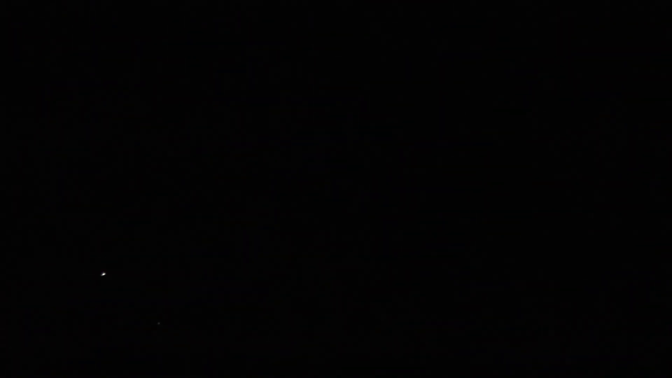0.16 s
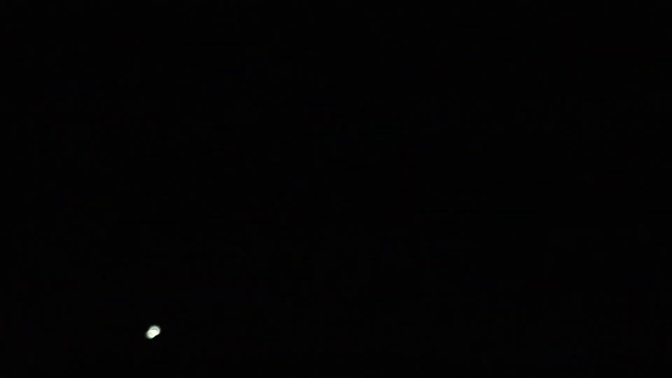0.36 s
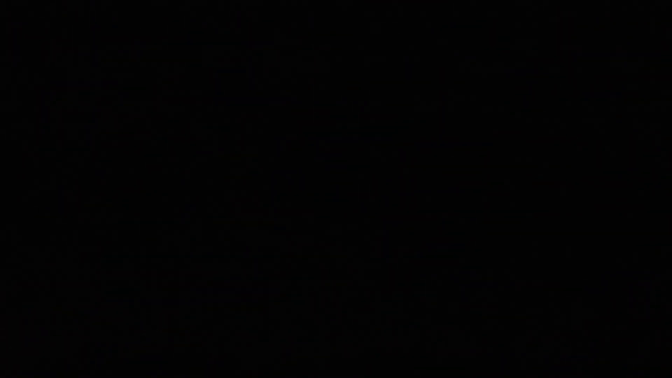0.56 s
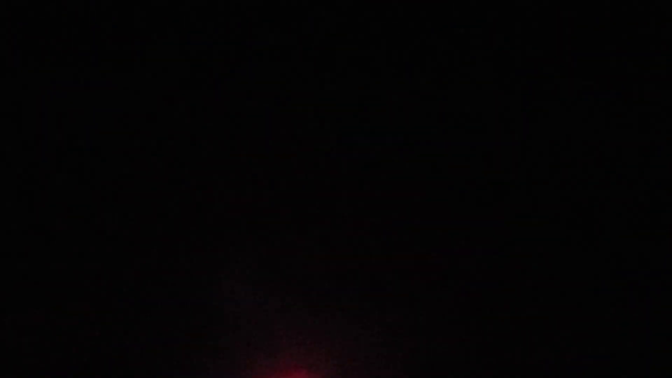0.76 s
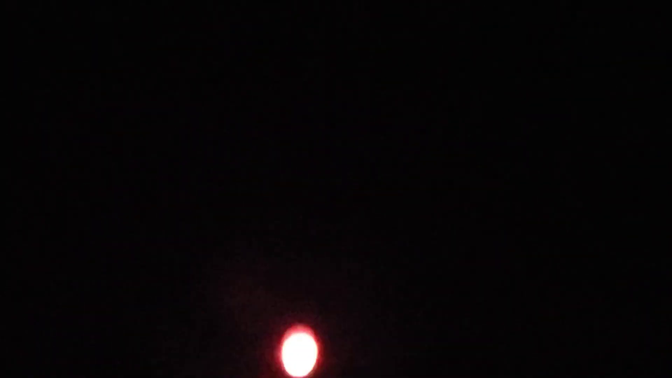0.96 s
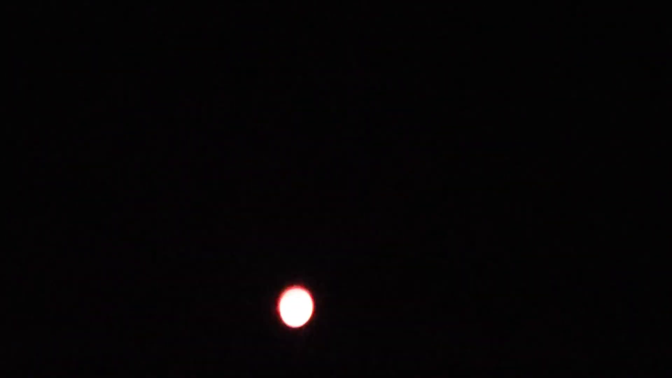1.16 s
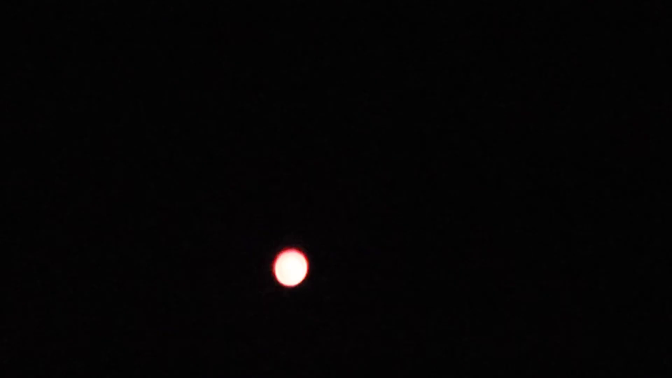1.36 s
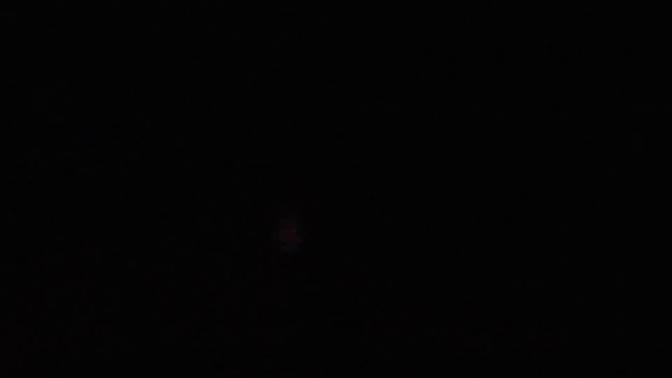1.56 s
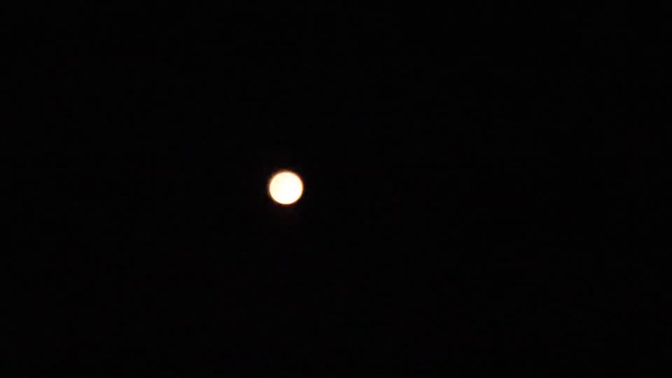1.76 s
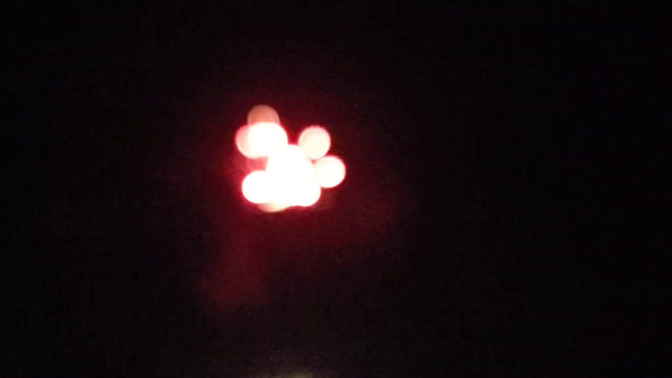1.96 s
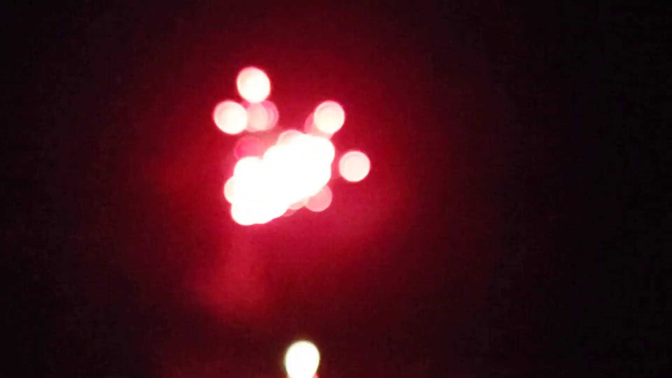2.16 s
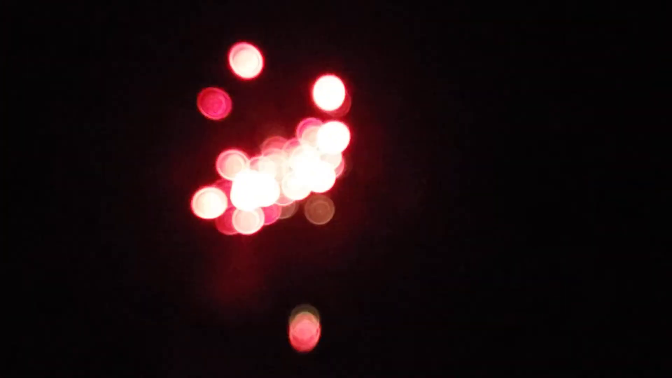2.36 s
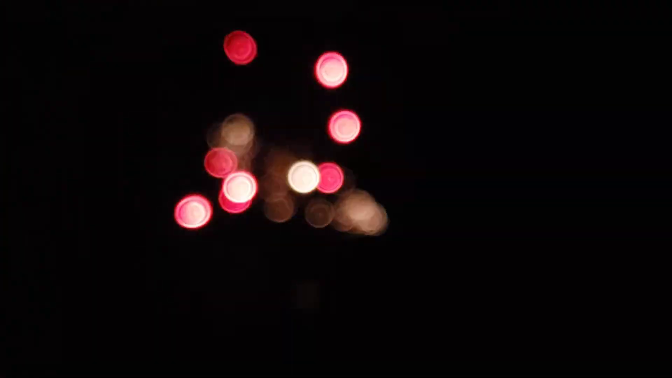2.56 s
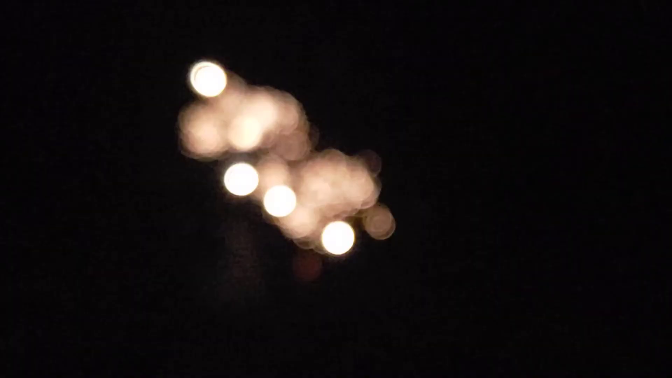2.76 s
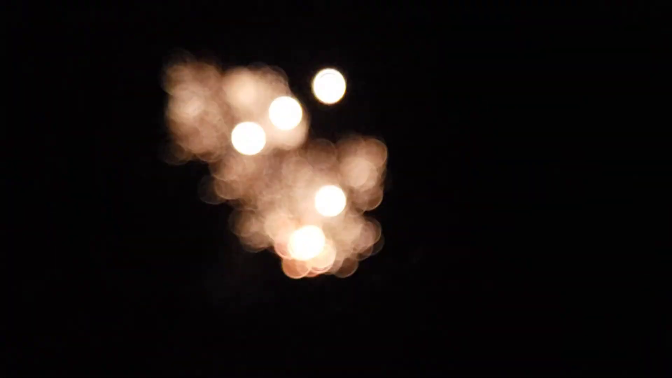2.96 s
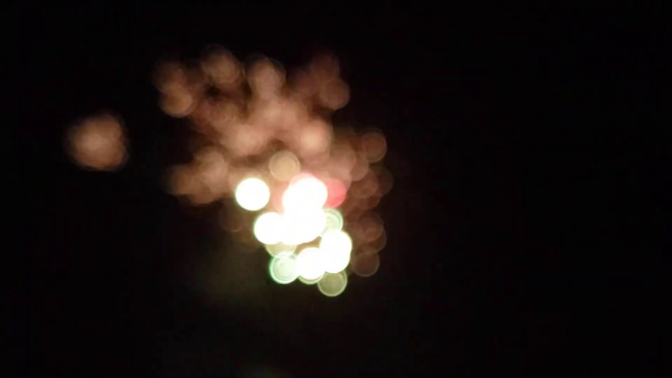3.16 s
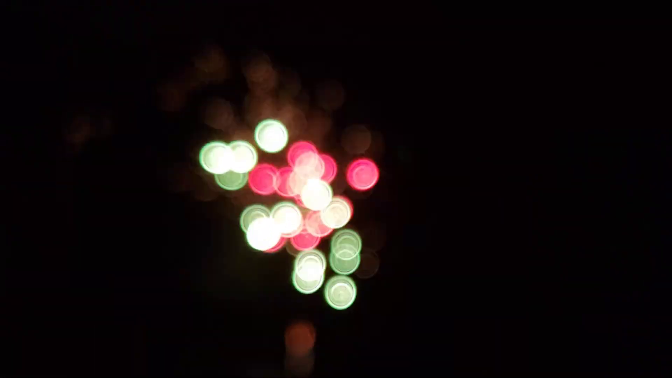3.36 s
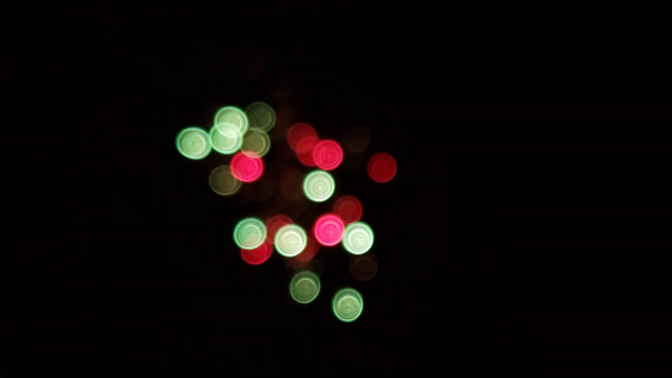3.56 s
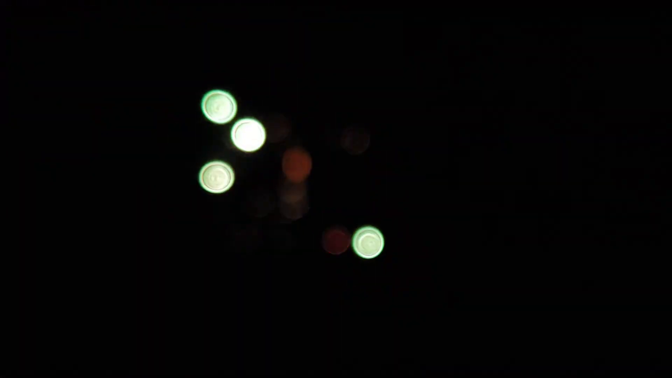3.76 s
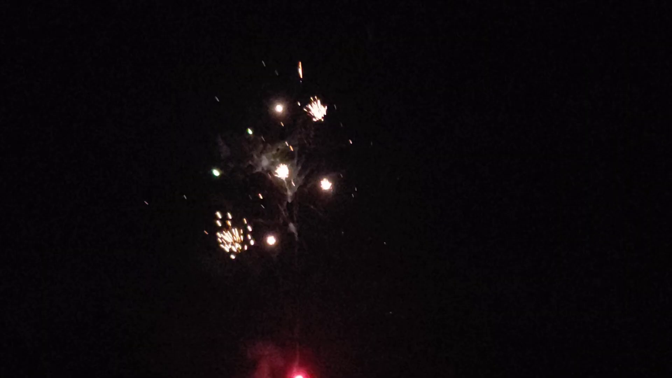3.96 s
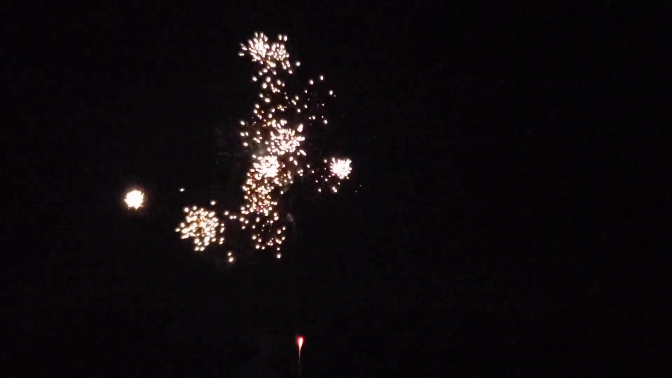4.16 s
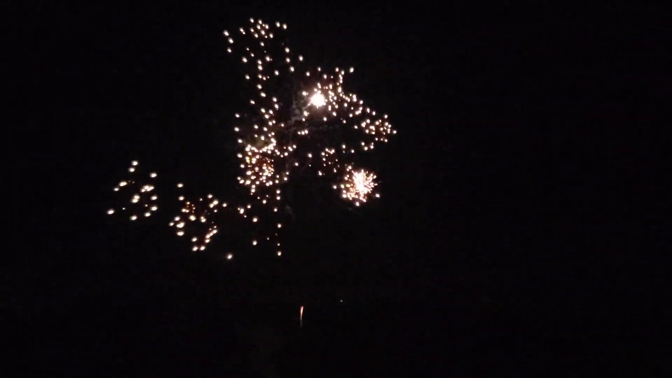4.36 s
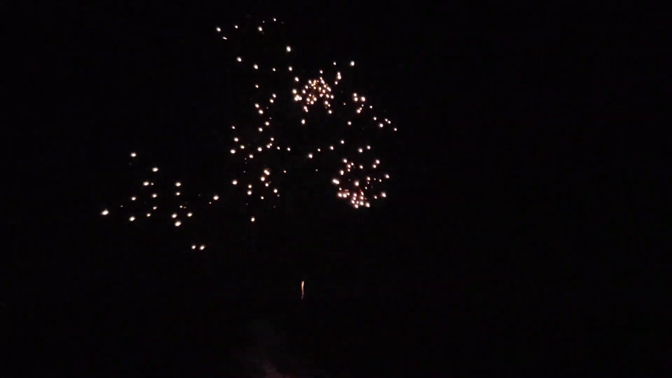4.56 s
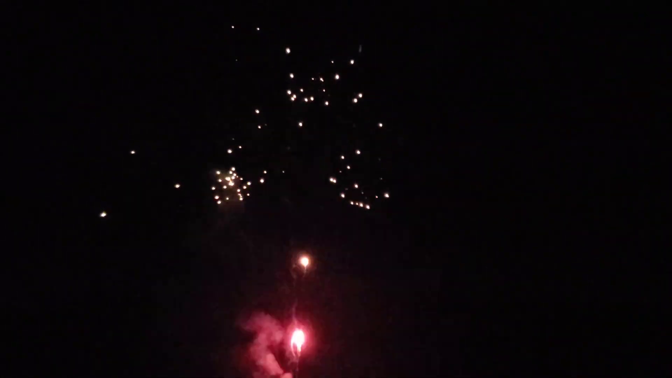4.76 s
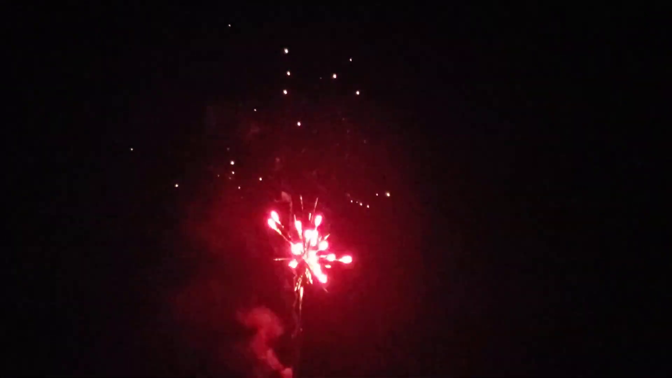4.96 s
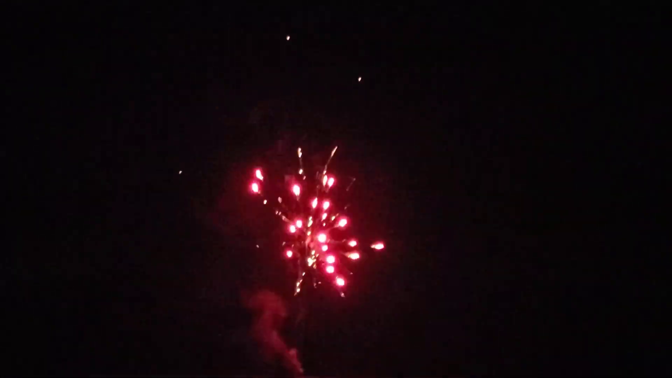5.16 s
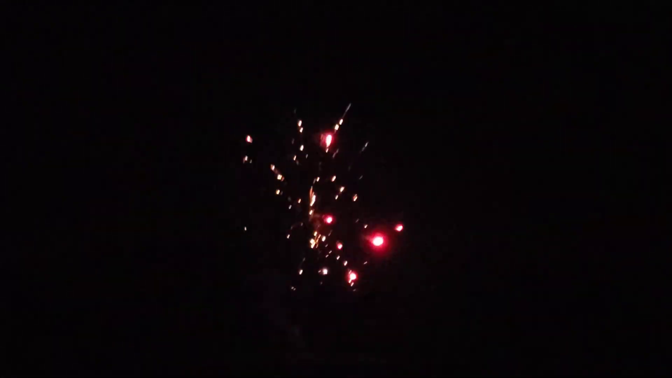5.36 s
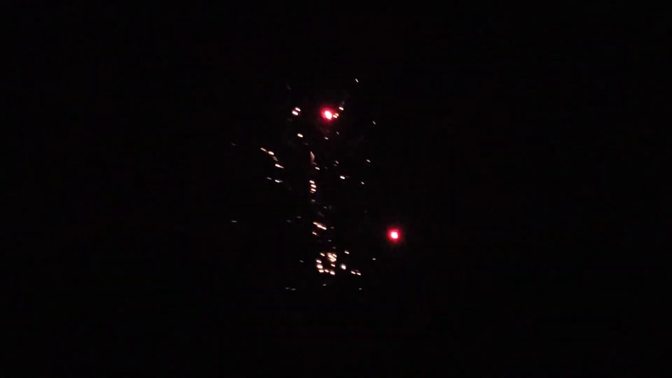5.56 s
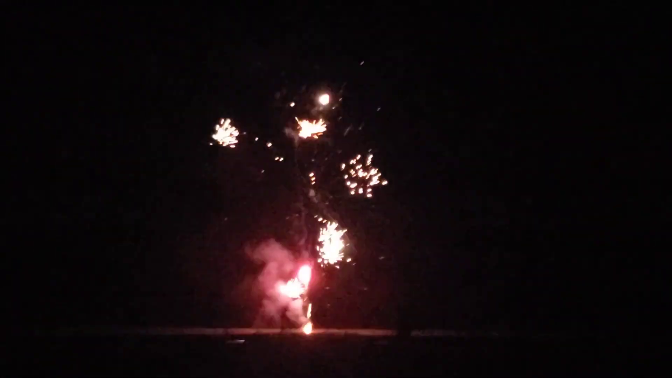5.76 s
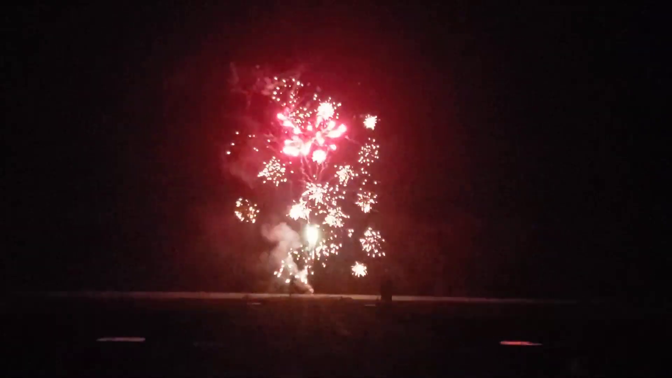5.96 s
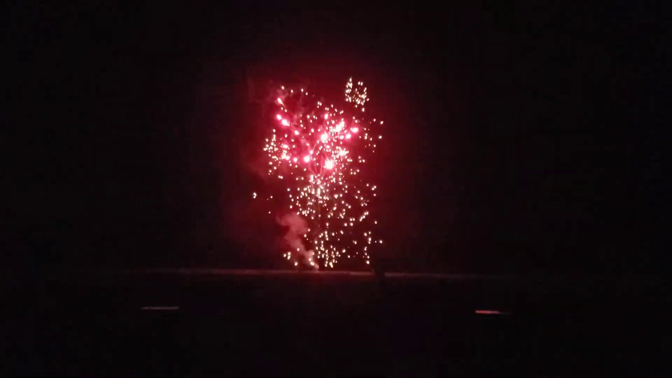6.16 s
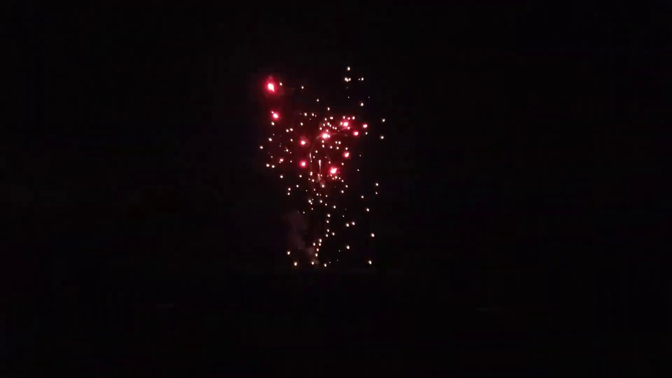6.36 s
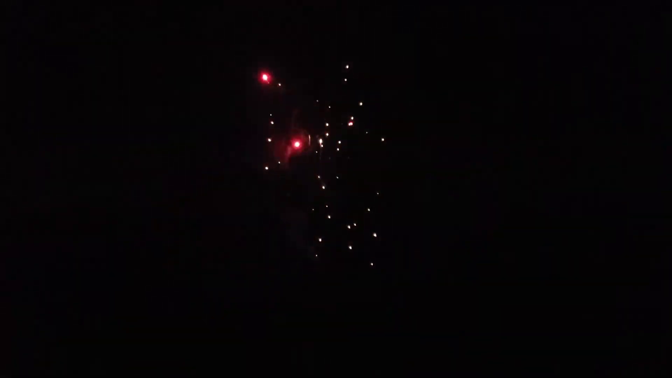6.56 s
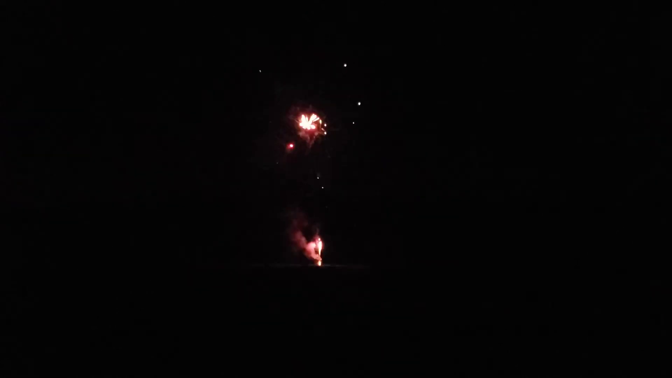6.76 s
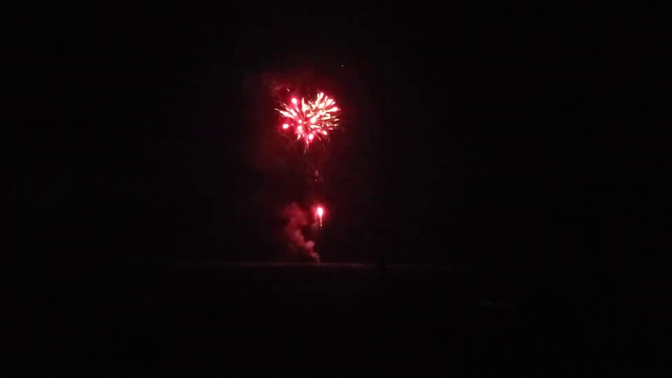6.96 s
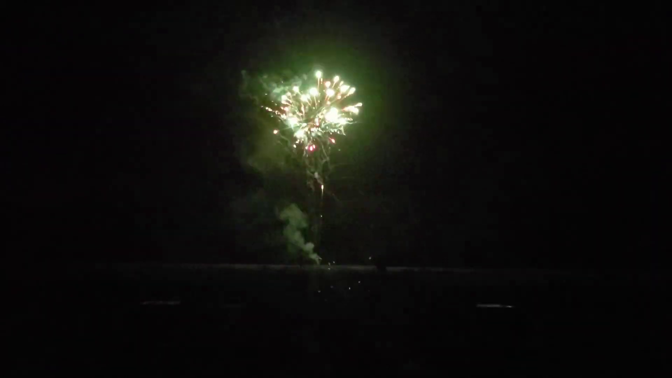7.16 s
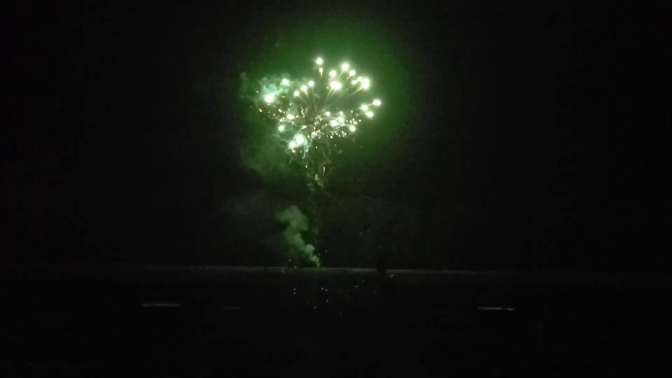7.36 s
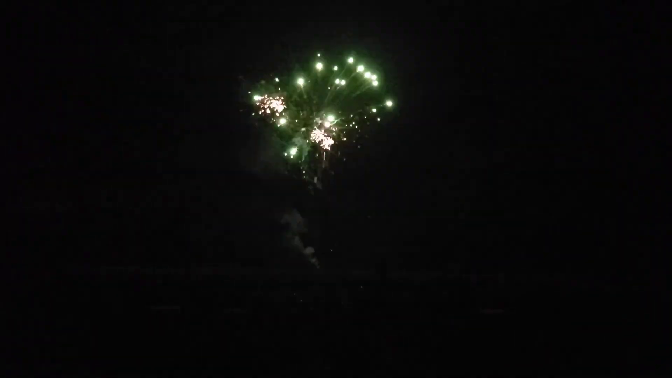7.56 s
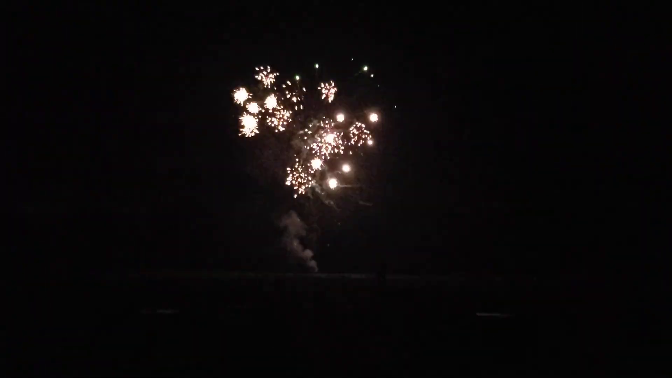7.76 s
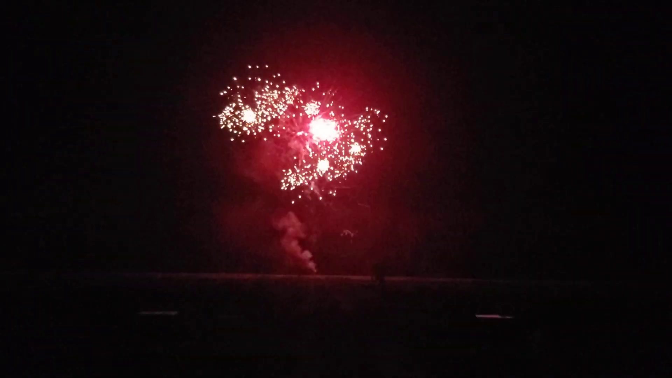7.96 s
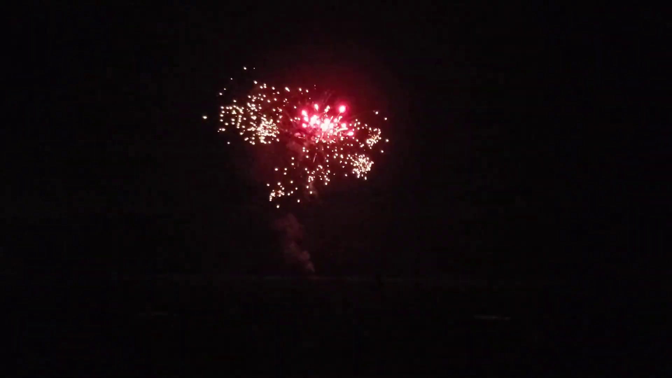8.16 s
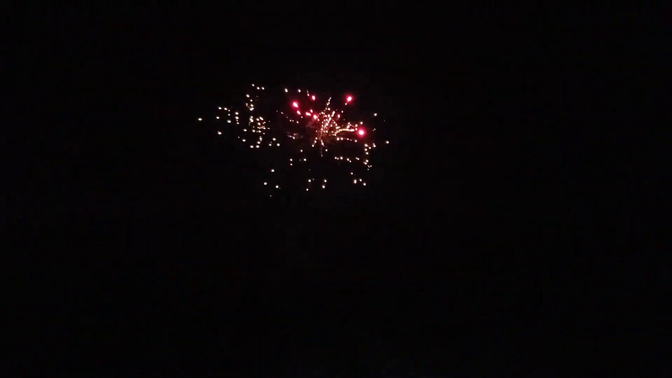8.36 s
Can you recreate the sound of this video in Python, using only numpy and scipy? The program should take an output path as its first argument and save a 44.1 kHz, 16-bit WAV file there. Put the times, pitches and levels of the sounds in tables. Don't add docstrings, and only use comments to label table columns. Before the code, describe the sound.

Small consumer fireworks go up one after another over open ground. Short tube thumps precede dry, hard bangs; dense snapping crackle comes in three main volleys, with a single piercing, descending whistle in the middle. Echoes slap back quickly, then swell from far trees and linger. A fast raspy cricket buzz and faint insect haze fill the gaps. The camera is some way off, its sound brighter on the right and squashed by the loudest blasts.

```python
import sys
import numpy as np
from scipy import signal
from scipy.fft import rfft, irfft, next_fast_len
from scipy.io import wavfile
from scipy.ndimage import map_coordinates

SR = 44100
rng = np.random.default_rng(int(sys.argv[2]) if len(sys.argv) > 2 else 0)


def file_out(sig):
    cols = np.atleast_2d(sig).T
    lim = np.clip(cols, -1, 1)
    pcm = np.round(lim * 32767).astype(np.int16)
    wavfile.write(sys.argv[1], SR, pcm)


def gain_from_decibels(decibels):
    exponent = np.asarray(decibels, float) / 20
    return 10 ** exponent


N = 370440


def unit(x):
    return x / np.sqrt(np.mean(x ** 2) + 1e-20)


def along(points, hz):
    f, v = np.transpose(points)
    return np.interp(np.log(hz + 1), np.log(f + 1), v)


def curves(rows):
    s, *cols = np.transpose(rows)
    return [np.interp(np.arange(N) / SR, s, c) for c in cols]


def wobble(rate):
    return map_coordinates(rng.standard_normal(int(N * rate / SR) + 4), [np.arange(N) * rate / SR])


def filtered(x, response):
    m = 2 * next_fast_len(x.shape[-1] // 2 + 4096)
    return irfft(rfft(x, m) * response(np.fft.rfftfreq(m, 1 / SR)), m)[..., :x.shape[-1]]


def coloured(x, colour):
    return filtered(x, lambda hz: gain_from_decibels(along(colour, hz)))


def causal(db):
    c = irfft(np.log(gain_from_decibels(db)))
    c[1:len(c) // 2] *= 2
    c[len(c) // 2 + 1:] = 0
    return np.exp(rfft(c))


def add(track, s, x):
    room = track[..., round(s * SR):][..., :x.shape[-1]]
    room += x[..., :room.shape[-1]]


def blast(ms, bounce_ms, bounce_db):
    u = (np.arange(600) / SR * 1000 - np.array([[0], [bounce_ms]])) / ms
    pulses = (u >= 0) * (1 - u) * np.exp(-np.abs(u))
    return gain_from_decibels([0, bounce_db]) @ pulses


# (time [s], ground bounce delay [ms], bounce level [dB], overload swing [dB], far roll [dB])
SHELLS = [
    (2.1925, 2.216, -4, -13, -3),
    (2.326, 2.276, -3.5, -19, -0.5),
    (3.2489, 1.7, -15, -10, -1.5),
    (3.4844, 2, -2.5, -29.5, -1),
    (5.2314, 1.15, -3, -12.5, 2.5),
    (6.1565, 1.73, -6, -17.5, 0),
    (7.1589, 5.1, -14, -10, -1),
    (7.3203, 1.14, -5.5, -11, -1.5),
    (8.2982, 1.36, -5.5, -24, 4),
]


def shells():
    near, far, swing, t = np.zeros(N), np.zeros(N), np.zeros(N), np.arange(SR // 5) / SR
    db = 1.48
    for s, bounce_ms, bounce_db, swing_db, roll_db in SHELLS:
        ms = 0.3 * gain_from_decibels(0.11 * (swing_db + 10.0))
        add(near, s, gain_from_decibels(db + 2) * blast(ms, bounce_ms, bounce_db))
        add(near, s, gain_from_decibels(db - 5.5) * blast(1.62 * ms, 2.45, -3))
        add(far, s, gain_from_decibels(db + 5 + roll_db) * blast(ms, 0, -60))
        debris = np.diff(rng.standard_normal(len(t) + 1))
        add(near, s, gain_from_decibels(db - 15.5 - 60 * t / 0.022) * debris)
        turns = 62 * t - 170 * t ** 2
        swing_level = gain_from_decibels(swing_db + 11.0 - 60 * t / 0.072) * (t < .15)
        add(swing, s + 0.0025, swing_level * np.sin(2 * np.pi * turns))
    return near, far, swing


# (time [s], peak level [dB])
STARS = [(2.8328, -21), (2.9034, -16), (3.5637, -12.5), (4.2618, -17), (4.3818, -15), (4.419, -15),
         (4.4357, -15), (4.45, -17.5), (4.4754, -19), (4.4878, -13), (4.5002, -14.5), (4.5158, -15.5),
         (4.5283, -19), (4.5555, -14), (4.562, -15), (4.5929, -15), (4.613, -17), (4.635, -25),
         (4.643, -11.5), (4.6909, -17), (4.7022, -16), (4.7177, -11), (4.7646, -12.5), (4.8245, -15.5),
         (5.1096, -15.5), (5.8421, -23), (6.067, -14), (7.9437, -18.5), (7.9646, -19.5), (7.9987, -20.5)]
# (time [s], peak level [dB])
LOUD_STARS = [(3.0667, -13), (3.0983, -11.5), (3.1572, -10.5), (3.187, -7.5), (3.202, -10.5),
              (3.2245, -7.5), (3.2398, -6.5), (3.3109, -15.5), (3.3486, -13.5), (3.4162, -11), (3.425, -12),
              (3.47, -15), (3.4974, -12.5), (3.513, -16), (6.1818, -12.5), (6.2218, -13), (6.2494, -14),
              (6.269, -12.5), (6.2891, -13), (6.3227, -10), (6.4073, -12), (6.4581, -11.5), (6.4866, -12),
              (6.4978, -12), (8.0122, -19), (8.0422, -20.5), (8.0716, -12.5), (8.1323, -14.5),
              (8.1707, -10), (8.3707, -12)]
# (start [s], pops [count], gap [ms], mean peak level [dB])
VOLLEYS = [(3.0221, 3, 9.2, -20), (3.0571, 1, 0, -17), (3.1114, 2, 4.3, -18), (3.1441, 2, 26, -15.5),
           (3.1939, 3, 18, -14), (3.2866, 2, 5.2, -23), (3.3248, 1, 0, -18), (3.3591, 2, 18, -18),
           (3.4029, 2, 5.3, -18.5), (4.4286, 2, 12, -22.5), (6.1697, 1, 0, -13), (6.2173, 1, 0, -15),
           (6.274, 2, 5.2, -14), (6.3324, 3, 7, -15), (6.3573, 4, 5.5, -15), (6.3898, 2, 16, -15.5),
           (6.4215, 3, 9, -15), (6.5081, 2, 7.4, -20), (8.0546, 2, 23, -17), (8.0974, 2, 5.8, -20),
           (8.1279, 2, 15, -19), (8.1678, 3, 6.8, -19), (8.2022, 3, 8.3, -15), (8.2288, 5, 5.8, -16),
           (8.275, 2, 4.7, -20), (8.2938, 1, 0, -15), (8.3105, 3, 17.5, -16.5), (8.3898, 1, 0, -15)]


def pops():
    rows = STARS + LOUD_STARS
    for start, count, gap_ms, db in VOLLEYS:
        gap, size = rng.standard_normal((2, count))
        order = np.arange(count)
        unevenness = 0.1 * gap * gap_ms / 1000 * (order > 0)
        s = start + order * gap_ms / 1000 + unevenness
        rows = rows + list(zip(s, db + 1.5 * size))
    return rows


def stars():
    out, t = np.zeros(N), np.arange(600) / SR
    for s, db in pops():
        size, bounce = rng.standard_normal(2)
        debris = gain_from_decibels(-12 - 60 * t / .015) * rng.standard_normal(600)
        bounce_ms = rng.uniform(1.1, 2.8)
        pop = blast(0.16 * gain_from_decibels(1.2 * size), bounce_ms, -4 + 2 * bounce)
        add(out, s, gain_from_decibels(db + 3.0) * (pop + debris))
    return out


# (time [s], thump level [dB], snap level [dB], tube pitch [Hz], far roll [dB])
LIFTS = [
    (1.0151, -11.5, -14.5, 233, 5.5),
    (2.1439, -15.5, -17, 310, 0),
    (2.304, -21, -19, 303, 1.5),
    (3.4701, -26.5, -25.5, 300, 14),
    (4.193, -25, -30, 260, -1),
    (4.989, -23.5, -24.5, 280, 8),
    (6.0337, -21, -26, 280, 6),
    (7.1145, -22, -22, 291, 9),
]
# (frequency [Hz], level [dB])
JET = [(600, -18), (1000, -3.5), (2600, -24), (4350, -3.5), (5300, -14.5), (6100, -2.5), (8000, -15),
       (11000, -8.5)]


def lifts():
    near, far, t = np.zeros(N), np.zeros(N), np.arange(600) / SR
    for s, db, snap_db, tube_hz, roll_db in LIFTS:
        ring = gain_from_decibels(db - 9 * (t * tube_hz) ** 2) * np.sin(2 * np.pi * tube_hz * t + .6)
        hiss = gain_from_decibels(9.5 - 60 * t / 0.012) * coloured(rng.standard_normal(600), JET)
        add(near, s, ring + gain_from_decibels(snap_db) * (blast(0.021, 0.247, 0) + hiss))
        add(far, s, gain_from_decibels(roll_db) * (ring + gain_from_decibels(snap_db + 14.0) * blast(0.12, 0, -63)))
    return near, far


# (time [s], second harmonic [Hz])
WHISTLE = [(3.468, 4345), (3.49, 4300), (3.6, 4195), (3.72, 4010), (3.85, 3820), (4.03, 3686), (4.15, 3650),
           (4.21, 3550), (4.35, 3524)]
# (time [s], level [dB])
FLAME = [(3.478, -31), (3.52, -54), (3.59, -28.5), (3.63, -44), (3.69, -32.5), (3.776, -39), (3.85, -29),
         (4.05, -28), (4.3, -35.5)]


def whistle():
    t = np.arange(N) / SR
    hz, = curves(WHISTLE)
    power, = curves([(s, gain_from_decibels(2 * db)) for s, db in FLAME])
    dying = np.clip((t - WHISTLE[-1][0]) / 0.16, 0, 1)
    lit = np.clip((t - WHISTLE[0][0]) / 0.0017, 0, 1) * np.clip((1 - dying) / 0.095, 0, 1)
    full = np.clip(np.minimum(t - 3.5, (4.38 - t) / 4) / .012, 0, 1)
    shake = 1 + 0.0025 * wobble(60) + 0.0061 * wobble(400)
    turn = np.cumsum(np.pi * (hz + 110.4 * dying) * shake) / SR
    db = 10 * np.log10(power) - 14 * dying ** 2
    body = gain_from_decibels(db - 35) * np.sin(turn) + gain_from_decibels(db + 3) * np.sin(2 * turn)
    third = gain_from_decibels(0.79 * (db + 32) - 42 + 1.8 * wobble(30)) * np.sin(3 * turn)
    upper = np.zeros(N)
    for k, top_db in [(4, -50), (5, -47), (6, -54)]:
        upper += gain_from_decibels(.4 * (db + 32) + top_db + 2.9 * wobble(20)) * np.sin(k * turn)
    flame = gain_from_decibels(1.3 * wobble(45) + 1.2 * wobble(150))
    return lit * flame * (body + full * (third + upper))


# (time [s], peak level [dB], brightness [dB per octave])
SLAPS = [
    (0.506, -43, 0.5),
    (0.7997, -45, -24),
]
# (frequency [Hz], width [Hz], level [dB])
TICK = [(2600, 190, -4), (6450, 340, 1), (9100, 400, 27), (10700, 400, 29)]


def ticks():
    out, t = np.zeros(N), np.arange(600) / SR
    for s, db, bright_db in SLAPS:
        for hz, width_hz, ring_db in TICK:
            level = gain_from_decibels(db + ring_db + bright_db * max(np.log2(hz / 6300), 0))
            shape = np.exp(-np.pi * width_hz * t) * (1 - np.exp(-t / 0.00039))
            add(out, s, level * shape * np.sin(2 * np.pi * hz * t))
    return out


# (frequency [Hz], likeness [0 to 1])
ALIKE = [(100, 0.99), (400, 0.71), (1000, 0.063), (3000, 0.024)]


def diffuse(size):
    def mid_side(hz):
        turn = np.arccos(np.clip(along(ALIKE, hz), 0, 1)) / 2
        return np.array([np.cos(turn), np.sin(turn)])
    mid, side = filtered(rng.standard_normal((2, size)), mid_side)
    return np.array([mid + side, mid - side])


def tail(t60s, swell, start, size):
    hz, t, z = signal.stft(diffuse(size), SR, nperseg=128)
    decay = gain_from_decibels(-60 * np.maximum(t - start, 0) / along(t60s, hz)[:, None])
    x = signal.istft(z * decay, SR, nperseg=128)[1][:, :size]
    x = x * gain_from_decibels(np.interp(np.arange(size) / SR, *np.transpose(swell)))
    return x / np.linalg.norm(x[0])


def echoed(feed, echo):
    return signal.fftconvolve(feed[None], echo, axes=1)[:, :N]


# (delay [s], level [dB])
WALLS = [
    (0.0179, -16.5),
    (.277, -34),
]


def walls(near_feed, far_feed):
    out = np.zeros(N)
    for (delay, db), feed in zip(WALLS, [near_feed, far_feed]):
        add(out, delay, gain_from_decibels(db) * feed)
    return out


# (frequency [Hz], time to fall 60 dB [s])
NEAR = [(100, .3), (1200, .25), (2500, .08), (5000, .06), (9000, .3)]
# (time [s], level [dB])
YARD = [(0, 2.5), (.004, -25), (.0065, -10), (0.012, -4.5), (0.0125, 1), (0.017, -6), (.045, -15.5),
        (0.131, -77)]


def yard(feed):
    return echoed(feed, filtered(tail(NEAR, YARD, 0, size=6000), lambda hz: gain_from_decibels(-hz / 960)))


# (frequency [Hz], time to fall 60 dB [s])
TREES = [(100, 2.4), (900, 4.3), (2200, 2.23), (5500, 1.11), (12000, 2.25)]
# (time [s], level [dB])
ROLL = [(0, -64), (0.028, -7), (0.321, -33), (0.337, 0.5), (0.382, -4), (.45, 3), (.75, 7.5), (1.05, 4),
        (1.9, 0)]
# (frequency [Hz], level [dB])
ROLL_COLOUR = [(40, -2), (150, -12.5), (400, -5), (900, -1.5), (2000, -4), (5000, -2.5), (12000, -4.5)]


def tree_line(feed):
    return echoed(feed, coloured(tail(TREES, ROLL, 0.3, size=2 * SR), ROLL_COLOUR))


# (frequency [Hz], time to fall 60 dB [s])
EARLIER = [(400, 1.8), (2000, 2.3), (5000, 0.61)]


def earlier_burst():
    return filtered(tail(EARLIER, [(0, 0)], 0, size=SR), lambda hz: gain_from_decibels(-hz / 300))


# (frequency [Hz], level [dB])
WING = [(8500, -85), (10800, -28), (11900, -9), (12350, 0), (12800, -4), (13200, -1), (13750, -13),
        (14500, -2), (15600, -8), (17000, -24)]


def cricket():
    out, t = np.zeros(N), np.arange(300) / SR
    strokes_per_s = 62.9
    fall_hz = 12250 + 3500 * np.exp(-(t / .0017) ** 2)
    shape = (1 - np.exp(-t / .0004)) * gain_from_decibels(-60 * t / .013)
    for s in np.arange(.0112, N / SR, 1 / strokes_per_s):
        for gap, db in [(0, -1.2), (.0062, -0.77)]:
            rasp = 1 + .75 * rng.standard_normal(300)
            turn = np.cumsum(2 * np.pi * fall_hz * rng.normal(1, 0.0202)) / SR
            add(out, s + gap, gain_from_decibels(db + rng.normal(0, 0.51)) * shape * rasp * np.sin(turn))
    return unit(coloured(out, WING))


# (frequency [Hz], level [dB])
RUMBLE = [(120, -6), (220, -7.5), (400, 5), (800, -9), (1600, -18.5), (2600, -28), (4000, -60), (7000, -81)]
# (frequency [Hz], level [dB])
DEEP = [(20, -20), (45, 5), (90, -4.5), (160, -7), (300, -20), (600, -78)]
# (frequency [Hz], level [dB])
FAR_INSECTS = [(3300, -54), (4000, -22.5), (4400, -24), (5200, -41), (8200, -46), (9500, -6.5),
               (11300, -2.5), (12500, -4), (15500, -2)]
# (time [s], level [dB])
GAIN = [(0.0, -67.5), (0.58, -71), (1.68, -58), (2.03, -60), (2.32, -65.5), (3.34, -67), (7.23, -64.5),
        (7.34, -64.5), (8.4, -68)]


def night():
    gain_db, = curves(GAIN)
    rumble = unit(coloured(diffuse(N), RUMBLE))
    deep = unit(coloured(diffuse(N), DEEP))
    haze = unit(coloured(rng.standard_normal((2, N)), FAR_INSECTS))
    gusts = gain_from_decibels(1.8 * wobble(7))
    rumble_level = gain_from_decibels(0.2 * (gain_db + 65.5) - 53.5 + 0.93 * wobble(6.7))
    air = rumble_level * rumble + gain_from_decibels(gain_db + 7.5) * gusts * deep
    return air + gain_from_decibels(gain_db + 30) * cricket() + gain_from_decibels(gain_db + 20) * haze


def ducking():
    drop_db, t = np.zeros(N), np.arange(SR // 5) / SR
    for s, *_ in SHELLS:
        add(drop_db, s, -13 * np.exp(-(t / 0.011) ** 2))
    return gain_from_decibels(drop_db)


def scene():
    burst, burst_far, swing = shells()
    thump, thump_far = lifts()
    crackle, tone = stars(), whistle()
    direct = burst + thump + crackle
    out = np.array([direct + tone + ticks() + walls(direct, burst + crackle)] * 2)
    for feed, db in [(burst, -6), (thump, -14), (crackle, -7)]:
        out += gain_from_decibels(db) * yard(feed)
    for feed, db in [(burst_far, -11), (thump_far, -14), (crackle, -13), (tone, -19.5)]:
        out += gain_from_decibels(db) * tree_line(feed)
    add(out, 0, gain_from_decibels(-15) * earlier_burst())
    return out + ducking() * night() + swing * gain_from_decibels([[-19], [0]])


# (frequency [Hz], level [dB])
RIGHT_PORT = [(25, -11), (100, 1.5), (500, 0.5), (1000, 6), (1450, 0), (2600, 4), (4100, 8), (5500, 6),
              (6900, -1.5), (8000, -9), (10500, -13), (12500, -18), (16000, -24.5)]
# (frequency [Hz], level relative to the right port [dB])
LEFT_LOSS = [(90, -1), (350, -2.5), (690, -6), (1050, -2), (1550, -1), (2100, -12), (3100, -13),
             (4100, -24), (6200, -24), (7800, -11), (9500, -19), (11300, -5), (12500, -20), (14600, -40)]
# (frequency [Hz], level [dB])
CHANNEL = [(6500, 0), (8300, -8.5), (11000, -2)]


def microphones(dry):
    def ports(hz):
        right_db = along(RIGHT_PORT, hz)
        late = np.exp(-2j * np.pi * hz * .00007)
        return np.array([causal(right_db + along(LEFT_LOSS, hz)) * late, causal(right_db)])
    x = filtered(dry, ports)
    x = x / (1 + np.abs(x / .93) ** 6) ** (1 / 6)
    return filtered(x, lambda hz: gain_from_decibels(along(CHANNEL, hz) - np.clip(hz - 15900, 0, None) / 20))


def low_pass(x):
    return signal.sosfilt(signal.butter(12, 17070, fs=SR, output="sos"), x)


def record(dry):
    mix = microphones(dry)
    return low_pass(mix)


dry = scene()
out = record(dry)
file_out(out)
```